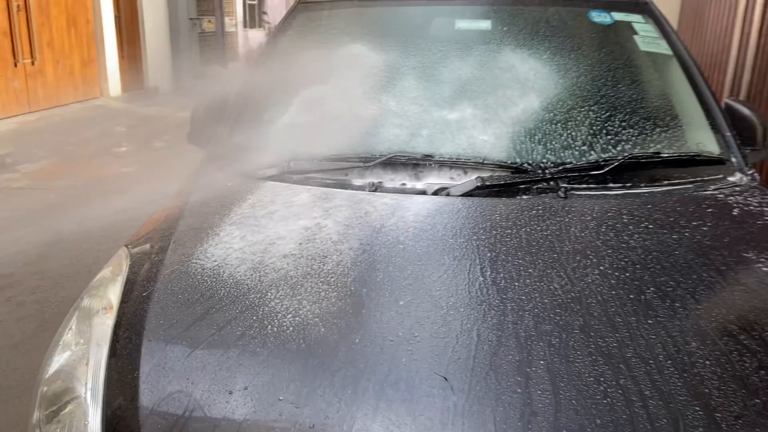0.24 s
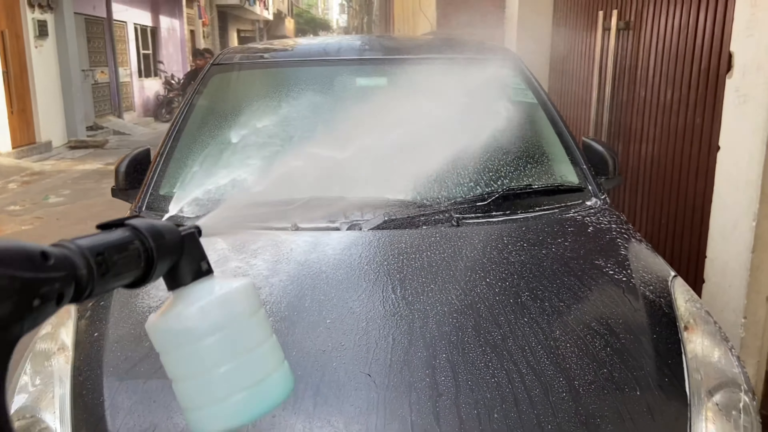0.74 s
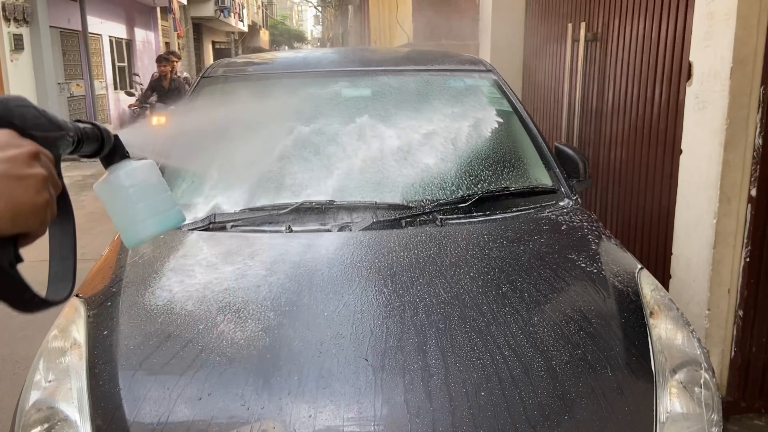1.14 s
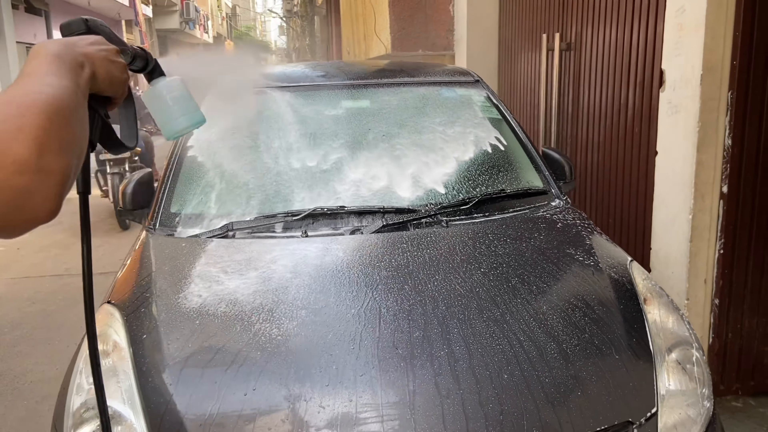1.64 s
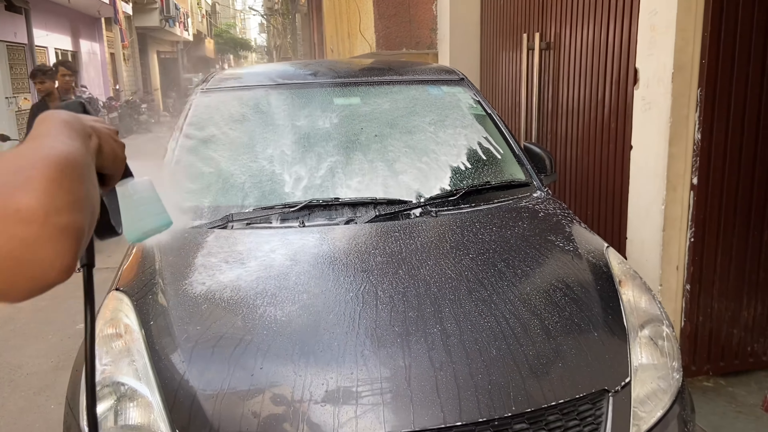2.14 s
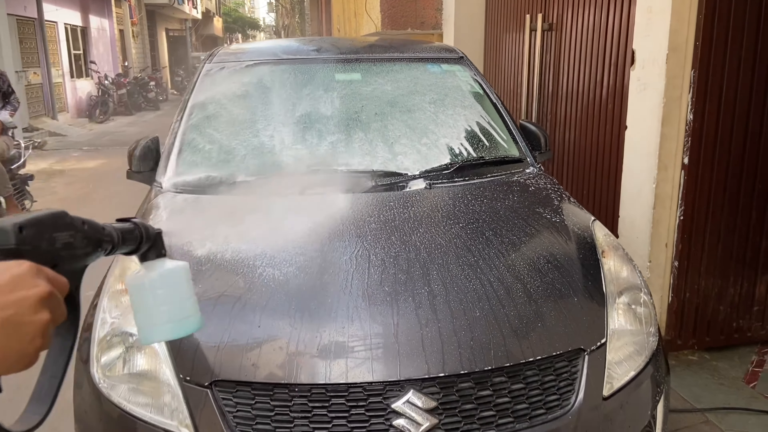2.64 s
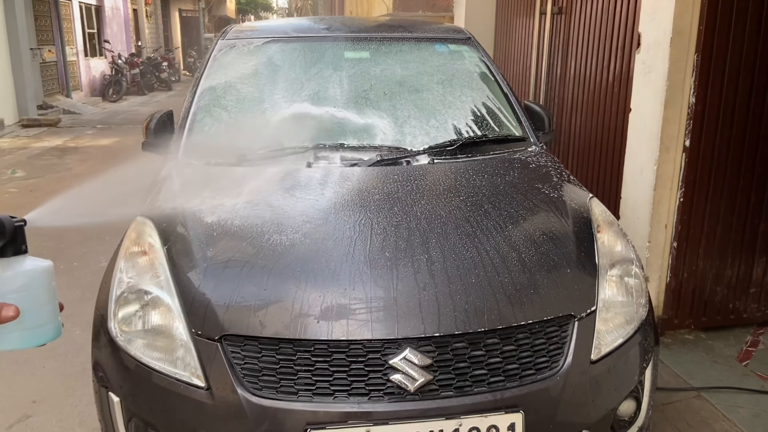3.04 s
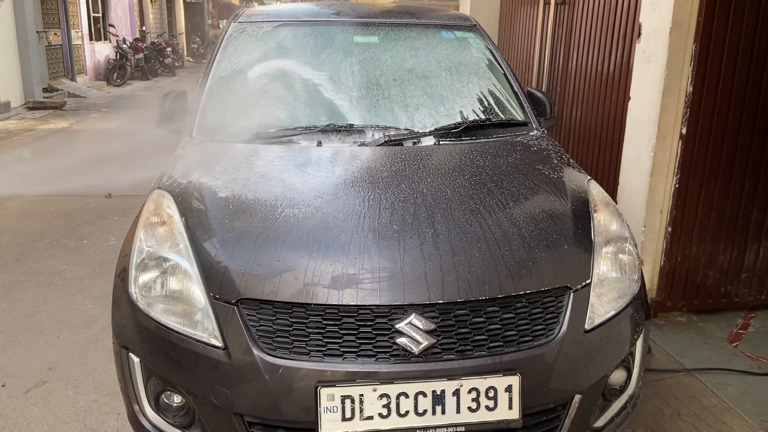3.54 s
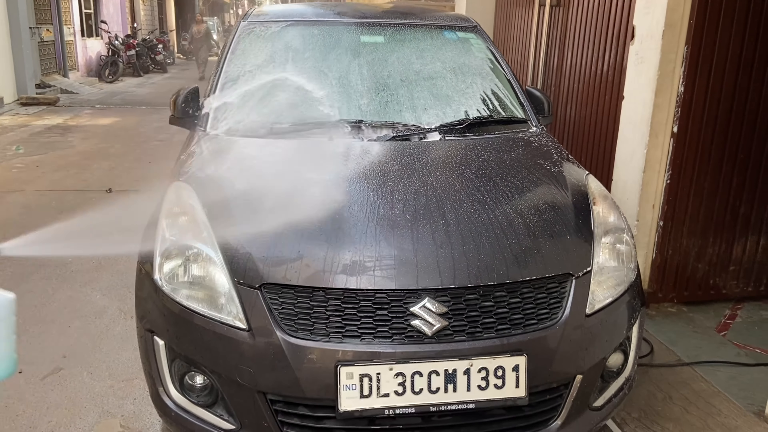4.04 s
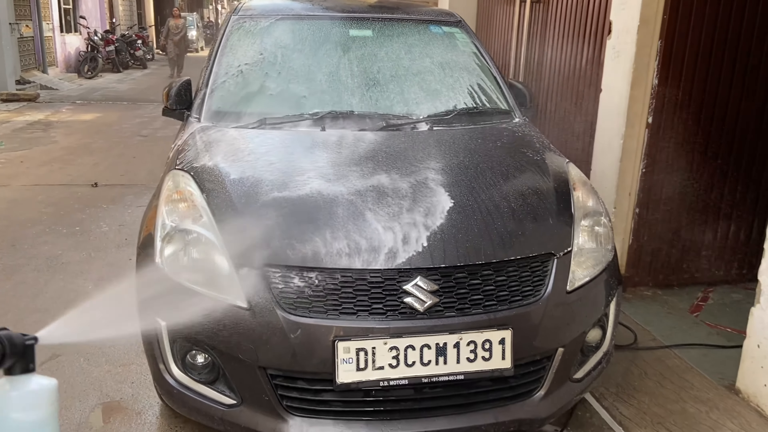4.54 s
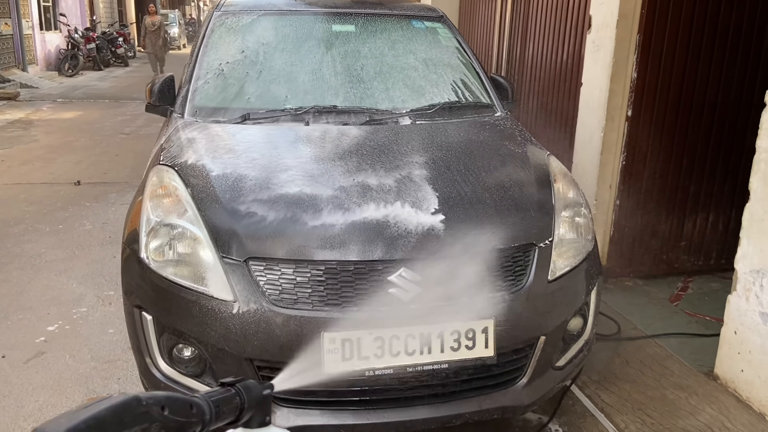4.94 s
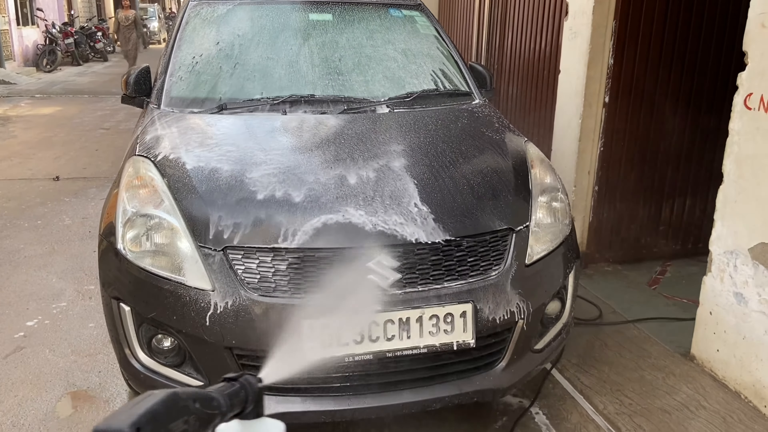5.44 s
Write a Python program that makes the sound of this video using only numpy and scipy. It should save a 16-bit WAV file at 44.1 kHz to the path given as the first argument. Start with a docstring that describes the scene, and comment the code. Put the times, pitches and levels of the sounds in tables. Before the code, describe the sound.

Forceful wet hiss and splash on glass and metal above an electric pump's drone, with a single-cylinder motorbike swelling by and fading.

```python
"""In a narrow lane an electric pressure washer sprays foam over a car while a single-cylinder motorbike passes behind.
Nozzle hiss and splash on glass and bonnet are banded noise; rough rings and a drifting whistle are narrow noise.
Motor and pump drone as noise and multiples of the shaft speed, with a shrill whine. The motorbike slows, picks up
and thumps past: a sum of firing orders, with rough gear whine while it is close.
Two microphone ports hear it all; the whole sound fades out and in once, briefly."""
import sys
import numpy as np
from scipy import signal
from scipy.fft import rfft, irfft
from scipy.io import wavfile

SR = 44100
rng = np.random.default_rng(int(sys.argv[2]) if len(sys.argv) > 2 else 0)


def wrap_up_sound(samples):
    """Save the sound to the file named by the first command line argument, as 16-bit audio."""
    columns = np.atleast_2d(samples).T
    # keep every value between -1 and 1, then stretch to whole-number steps
    tamed = np.clip(columns, -1, 1)
    steps = np.round(tamed * 32767).astype(np.int16)
    wavfile.write(sys.argv[1], SR, steps)


N = 250884
TIME = np.arange(N) / SR
SPLIT = np.array([[.5], [-.5]])   # shares a left-right difference in dB between the ports

# Coherence of noise at the two ports: (frequency [Hz], likeness [0-1])
LIKENESS = [(40, .97), (150, .85), (350, .6), (1000, .2), (2400, .6), (3400, .3), (4200, .7), (5500, .25),
            (6600, .86), (15000, .86)]
# Balance of noise: (frequency [Hz], left-right difference [dB])
TILT = [(40, 2.2), (300, 4.4), (1000, 3), (2800, 0.18), (5300, 3.5), (6300, .1), (15000, .1)]
# Phase of noise: (frequency [Hz], lead of the right port [turns])
PORT_TURNS = [(0, 0), (500, 0), (1100, .25), (2000, .14), (3100, -.19), (3700, .06), (4500, -.02),
              (6200, -1), (6900, -1), (15400, 1), (22050, 1)]

# The lance: (time [s], nozzle hiss level [dB], splash level [dB])
LANCE_DB = [(0, -28, -28), (.15, -26, -29), (.35, -22.5, -25.5), (.47, -23, -27.5), (.56, -23.5, -26.5),
            (.68, -26, -28), (.8, -28, -29.5), (1.2, -32, -34), (1.6, -34, -33.5), (2.2, -33, -33.5),
            (2.5, -31.5, -31), (3.0, -30.5, -30), (3.4, -30.5, -31.5), (3.7, -30, -29.5), (4, -29.5, -30.5),
            (4.3, -30, -30), (4.7, -29.5, -31), (5.15, -28.5, -31.5), (5.69, -30, -31)]
# Relative spectrum of the nozzle hiss: (frequency [Hz], density [dB per Hz])
HISS = [(1500, -22), (3000, -24), (5000, -36), (6500, 1.5), (8000, 2), (10000, 2.5), (12000, 4),
        (14000, 1.5), (15500, 2), (18000, -17)]
# Relative spectrum of the splash: (frequency [Hz], density [dB per Hz])
SPLASH = [(1200, -14), (1900, -1), (2250, 0), (2550, 3), (2900, 1), (3300, -0.5), (3800, -0.5),
          (4400, -3.5), (5300, -0.5), (6500, -8)]
# Balance of splash, landing foam and rings: (time [s], left-right difference [dB])
SPLASH_PAN = [(0, -5), (.35, 1), (.8, 1.5), (2.2, -0.5), (3.2, 1.5), (3.85, -1.5), (4.5, 1), (5.69, 0.5)]
# Splash heard straight from where the foam lands: (time [s], level [dB])
LANDING_DB = [(0, -29), (.06, -27), (.15, -25), (.25, -27.5), (.4, -28), (.55, -40), (.75, -37), (1.2, -49),
              (4.4, -50), (4.7, -38), (4.95, -36), (5.15, -33), (5.35, -38.5), (5.69, -38)]
# Its relative spectrum: (frequency [Hz], density [dB per Hz])
LANDING = [(1800, -1), (2100, -2), (2700, 0), (3300, 1), (3900, -3), (4400, 1.5), (4900, -2.5), (5600, -1)]
# Its coherence: (frequency [Hz], likeness [0-1])
LANDING_LIKENESS = [(1800, .9), (5600, .9)]
# Its phase: (frequency [Hz], lead of the right port [turns])
LANDING_TURNS = [(0, .14), (2000, .14), (2300, 0), (2700, -.17), (3350, -.5), (4000, -1), (4500, -1),
                 (5000, -1.17), (5500, -1.5), (22050, -2)]
# The spray crosses a hollow panel: (start [s], end [s], edge slope [dB/s], lower ring [Hz],
# lower ring level [dB], upper ring level [dB])
SWEEPS = [(0.04, 0.1, 32, 2500, -47, -34), (0.179, 0.389, 60, 2450, -35, -34.5),
          (0.503, 0.55, 150, 2380, -40, -60), (0.63, 0.68, 98, 2430, -39, -60),
          (2.59, 2.616, 120, 2600, -36, -54), (2.76, 2.86, 80, 2500, -36.5, -54),
          (2.96, 3.019, 100, 2516, -43, -54), (3.08, 3.13, 122, 2430, -43, -59),
          (3.27, 3.519, 60, 2463, -39, -59), (3.66, 3.78, 90, 2683, -36.5, -60),
          (4.13, 4.3, 60, 2495, -39, -61.5), (4.65, 4.76, 70, 2480, -40, -43),
          (4.869, 4.98, 70, 2540, -42, -42), (5.04, 5.259, 90, 2540, -39, -41),
          (5.44, 5.6, 60, 2680, -43, -38.5)]
# Noise bandwidths of the rings: (lower ring [Hz], upper ring [Hz])
RING_WIDTHS = (117, 1200)
UPPER_RING_HZ = 4415

# Relative spectrum of motor fan and lane rumble: (frequency [Hz], density [dB per Hz])
DRONE = [(30, -16), (50, 1), (110, 8), (170, 11), (250, 1), (400, -2.5), (470, 1.5), (535, -4), (620, 1),
         (800, -1.5), (1000, -4), (1250, 1), (1650, -5.5), (1900, -3), (2600, -19.5), (5500, -22)]
# Its level: (time [s], level [dB])
DRONE_DB = [(0, -28), (1, -29.5), (2, -29), (3, -26.5), (4, -28.5), (5, -30), (5.69, -29.5)]
# Thin tone between the pump's multiples: (time [s], level [dB])
MOTOR_TONE = [(0, -40), (.7, -48), (2.3, -49), (3.4, -53), (4.3, -58), (5.69, -60)]
MOTOR_TONE_HZ, SHAFT_HZ = 586.3, 46.52
# Orders of the pump tones: multiples of the shaft speed [-]
PUMP_MULTIPLES = [9, 10, 11, 12, 13, 14, 15, 25, 26, 28, 29, 31, 33, 37]
# Each pump tone shifts once as the listener moves about: (level before [dB], level after [dB],
# time of shift [s], left-right difference [dB], phase lead of the left port [rad])
PUMP = [(-52.5, -40, 3.96, 5.5, -1), (-39.5, -57, 4, 4, -0.5), (-51.5, -46, 2.8, 7, 1.26),
        (-41, -54, 4.1, 2.5, 1.6), (-41.5, -40, 2.8, 1.5, -0.2), (-45, -62, 1.6, 1, 4),
        (-47.5, -44, 1.7, 1.5, -1.25), (-39, -46.5, 2.44, -0.5, -1.43), (-47, -66, 4.3, 5.5, -0.5),
        (-65, -49, 4.7, 13, -4), (-47.5, -58, 3.3, -4, -2), (-41, -45, 4, -0.5, -2.5),
        (-45.5, -72, 3.7, -4, -1.5), (-81, -48.5, 2.7, -6, -4)]
SHIFT_SPAN_S = 0.24
# Single pump tones swell, sink or change side for a moment: (centre [s], half span [s],
# shaft multiple [-], level change [dB], left-right change [dB])
PUMP_SWELLS = [(0.26, 0.18, 10, -2.5, 0), (.1, 0.25, 12, -1, 7), (0.32, 0.13, 13, -8, 0),
               (0.88, 0.13, 13, -4, -3), (3.63, 0.19, 13, 3.5, -2), (0.092, 0.26, 15, 8.5, 0),
               (1.95, 0.35, 15, 3, 0), (1.8, .3, 11, -16, 0), (0.93, 0.43, 11, 9, 3),
               (0.38, 0.35, 25, -4.5, 1), (1.15, 0.43, 12, 3.5, -10), (2.1, 0.29, 12, 1, 4.5),
               (0.79, 0.42, 9, 4, 0), (5, 0.34, 12, -5, 4), (1.8, .3, 13, 2, -2), (2.4, .4, 13, -1, 4)]
# The motor's shrill slot whine: (time [s], level [dB])
WHINE = [(0.0, -56), (0.2, -43), (0.84, -49), (0.89, -39), (1.08, -49.5), (1.63, -40), (1.74, -54),
         (1.79, -39), (1.98, -50), (2.04, -40), (2.17, -47), (2.25, -38.5), (2.87, -39), (3.12, -45),
         (3.17, -38), (3.23, -45), (3.31, -42), (3.39, -49), (3.44, -34.5), (3.62, -43), (3.76, -36.5),
         (3.83, -46), (3.92, -41), (4.25, -43), (4.33, -46), (4.45, -37), (4.55, -49), (4.64, -40),
         (4.86, -36), (4.96, -46), (5.07, -41.5), (5.3, -39), (5.355, -50), (5.395, -34), (5.6, -36.5),
         (5.69, -43)]
WHINE_FLICKER_DB = 1.9

# Motorbike speed: (time [s], firing rate [1/s])
FIRING = [(0, 21.7), (.19, 22.2), (.38, 21.89), (.57, 20.85), (.95, 20.14), (1.14, 19.17), (1.33, 16.61),
          (1.52, 15.75), (2.28, 19.47), (2.66, 21.03), (3.42, 25.08), (3.61, 25.84), (3.8, 25.4),
          (3.99, 26.11), (4.18, 26.16), (4.75, 24.45), (4.94, 22.79), (5.32, 21.3), (5.69, 22.4)]
# The motorbike comes near and leaves: (time [s], exhaust level [dB])
BIKE = [(0.0, -34.5), (0.52, -33.5), (1.03, -34), (1.55, -32.5), (2.07, -26.5), (2.59, -25.5), (3.1, -19.5),
        (3.62, -19), (4.14, -20), (4.66, -24.5), (5.17, -35), (5.69, -40.5)]
# The two lowest orders, 2 and 3: (time [s], level of order 2 [dB])
THUD = [(0, -45), (.6, -54), (1.2, -45), (1.7, -57), (2.1, -52), (2.7, -44), (3.1, -49), (3.7, -39),
        (4.2, -45), (4.7, -43.5), (5.3, -39.5), (5.69, -44)]
# Colour of orders 4-10: (frequency [Hz], level against the exhaust [dB])
BOOM = [(60.0, -52), (90.0, -13), (120.0, -11.5), (150.0, -6.5), (175.0, -4.5), (200.0, -16.5),
        (240.0, -18.5), (290.0, -34)]
# Colour of the orders above 10, the rasp: (frequency [Hz], level before RASP_DB is added [dB])
EXHAUST = [(170, -5.5), (250, -8), (285, -5), (330, -8.5), (400, -17), (460, -12.5), (600, -25), (800, -8)]
RASP_DB = -15.5   # against the exhaust level
# Single orders swell or sink as the bike moves between the walls:
# (centre [s], half span [s], order [-], level change [dB])
ORDER_SWELLS = [(0.33, 0.19, 5, 2), (.38, 0.086, 6, 11.5), (0.57, 0.67, 8, 6.5), (1.19, 0.31, 9, 7.5),
                (1.47, 0.17, 10, 9), (1.77, 0.13, 9, 10), (1.28, .12, 8, 6), (1.25, .25, 4, 10),
                (.9, .45, 15, 7.5), (1.65, 0.55, 18, 6.5), (5.25, .45, 14, -9), (.15, .25, 11, -7),
                (4.7, .15, 5, 6), (2.0, .12, 8, 4.5), (2.0, .4, 4, -10), (5.23, 0.34, 4, 6),
                (5.11, 0.42, 3, 5), (1.5, .5, 11, -7), (1.4, .5, 12, -8), (5.25, .12, 6, 9),
                (2.04, 0.15, 6, -8), (2.18, 0.11, 5, 13.5), (2.55, 0.19, 7, 6), (2.75, 0.15, 14, 10.5),
                (2.9, 0.041, 7, -3), (2.63, 0.3, 22, 10), (2.9, .25, 21, 2), (3.18, 0.2, 20, 7.5),
                (3.34, 0.19, 19, 8), (3.65, 0.1, 19, 13.5), (3.37, 0.062, 7, -3), (3.68, 0.04, 7, 2.5),
                (3.87, 0.12, 8, -7.5), (3.08, .07, 6, -6), (3.39, 0.087, 5, -7), (3.34, .15, 9, 1),
                (4.5, 0.077, 6, 4), (3.18, 0.15, 14, 10.5), (3.25, 0.17, 13, 1), (3.35, 0.085, 8, -9),
                (3.62, 0.087, 13, 6.5), (3.75, 0.12, 14, 9), (3.7, 0.083, 8, 6), (3.9, 0.084, 7, -5),
                (4.2, 0.036, 6, 6), (4.33, 0.093, 7, -14), (4.6, 0.13, 8, -14), (4.55, 0.11, 7, 2),
                (4.9, .1, 7, -1), (6.5, 0.093, 5, 8), (4.4, 0.056, 6, 2), (3.7, 0.34, 18, 3),
                (4.3, 0.96, 11, -13), (3.1, 0.36, 4, -29), (3.14, 0.38, 5, 5.5), (3.16, 0.1, 7, 6.5),
                (3.66, 0.41, 5, 6), (4.0, 0.21, 8, 14), (4.07, 0.18, 5, -12), (4.37, 0.39, 13, 10),
                (4.26, 0.77, 7, -3.5), (4.4, 0.76, 4, 3.5), (4.9, 0.15, 8, 10.5), (4.95, 0.1, 6, -12),
                (5.41, 0.19, 8, 10.5)]
# Colour of the part unlike at the ports: (frequency [Hz], level before SIDE_DB is added [dB])
SIDEWAYS = [(40, -30), (90, -44), (150, -1), (200, -6), (240, -13), (300, -15.5), (450, -23), (800, -22)]
# Level of the unlike part against the exhaust, and its rise while the bike is abreast
SIDE_DB, ABREAST_S, ABREAST_SPAN_S, ABREAST_DB = -18, 4.05, 0.98, 9.5
FIRST_FIRING_TURNS = .42   # how far into its cycle the engine starts
SMEAR_RAD = 1.6   # phase scatter of the orders outside the blur; small enough that each firing throbs
DRAW_OUT_RAD = .16   # phase curvature: low orders lead the high ones
# For a while the echoes blur the throb: extra scatter as a multiple of SMEAR_RAD
BLURRED_S, BLURRED_SPAN_S, BLURRED_TIMES = 4.25, .5, 2.5
# Gear contacts: (time [s], tooth rate [Hz])
TOOTH_RATE = [(3.0, 865), (3.4, 905), (3.7, 916), (4.12, 943), (4.4, 921), (4.8, 894)]
# Gear whine: (multiple of the tooth rate [-], noise width [Hz], time of the bend [s], level there [dB],
# rise before it [dB/s], fall after it [dB/s]; a negative fall goes on rising)
CLATTER = [(1, 43, 4, -35, 3.5, -1), (2, 84, 3.65, -39.5, 9, 2), (4, 113, 4.3, -41.5, 22, 6)]
# Gears are heard only while the bike is close; how fast they come and go
CLOSE_START_S, CLOSE_END_S, COME_DB_PER_S, GO_DB_PER_S = 3, 4.72, 36, 120

# A rough whistle drifts through the spray: (time [s], centre frequency [Hz], level [dB])
WHISTLE = [(3.1, 2600, -57), (3.4, 2700, -41), (3.58, 2850, -34), (3.72, 2830, -29.5), (3.87, 2780, -33),
           (4.0, 2830, -35.5), (4.2, 2790, -39), (4.4, 2760, -37), (4.58, 2760, -43), (4.75, 2700, -55)]

FADE_S, FADE_OUT_S, FADE_IN_S, FADE_DB = 5.0055, .028, .027, -28
CUTOFF_HZ = 15950


def amp(db):
    """Decibel law: amplitude gain of a level in dB."""
    return 10 ** (np.asarray(db) / 20)


def rms_one(x):
    """Power normalisation: scale to rms 1."""
    return x / np.sqrt(np.mean(x ** 2) + 1e-20)


def in_time(rows):
    """Linear interpolation: the columns of a time table at every sample."""
    s, *columns = np.transpose(rows)
    return [np.interp(TIME, s, column) for column in columns]


def at_hz(points, hz):
    """Logarithmic frequency scale: read a spectrum between its points."""
    table_hz, values = np.transpose(points)
    return np.interp(np.log(hz), np.log(table_hz), values)


def bell(centre_s, span_s):
    """Gaussian envelope: 1 at its centre, 1/e one span away."""
    return np.exp(-((TIME - centre_s) / span_s) ** 2)


def swell(start_s, end_s, rise_db_per_s, fall_db_per_s):
    """Exponential growth and decay: 0 dB between two times, straight slopes in dB outside."""
    before = np.maximum(start_s - TIME, 0)
    after = np.maximum(TIME - end_s, 0)
    return -rise_db_per_s * before - fall_db_per_s * after


def drift(rate):
    """Low-pass random process: rms 1, changing about rate times a second."""
    step = 40   # samples per drawn value
    pole = np.exp(-2 * np.pi * rate * step / SR)
    draws = rng.standard_normal(N // step + 2002)
    slow = signal.lfilter([1], [1, -2 * pole, pole * pole], draws)[2000:]   # drop the settling
    return np.interp(np.arange(N) / step, np.arange(len(slow)), rms_one(slow))


def port_noise(spectrum, surge_db, patchy_db, likeness=LIKENESS, turns=PORT_TURNS):
    """Partial coherence: third-octave noise at two ports, surging together, flickering by band; rms 1."""
    hz = np.fft.rfftfreq(N, 1 / SR) + 1
    lowest_hz, highest_hz = spectrum[0][0], spectrum[-1][0]
    shared, own = rfft(rng.standard_normal((2, N)))
    alike = at_hz(likeness, hz)
    lead = np.exp(2j * np.pi * np.interp(hz, *np.transpose(turns)))
    right = lead * (alike * shared + np.sqrt(1 - alike ** 2) * own)
    ports = np.array([shared, right])
    ports *= amp(at_hz(spectrum, hz) + at_hz(TILT, hz) * SPLIT)
    ports *= (hz > lowest_hz) & (hz < highest_hz * 1.1)
    place = 3 * np.log2(hz)   # in third octaves
    out = 0
    for k in range(int(3 * np.log2(lowest_hz)), int(3 * np.log2(highest_hz)) + 2):
        crossfade = np.clip(1 - abs(place - k), 0, 1)
        band = irfft(ports * crossfade, N)
        out = out + band * amp(surge_db + patchy_db * drift(18.2))
    return rms_one(out)


def rough_tone(turn, width_hz, alike):
    """Random modulation: a carrier smeared into a narrow noise band, partly alike at the two ports."""
    left, own = (drift(width_hz) + 1j * drift(width_hz) for port in range(2))
    right = alike * left + np.sqrt(1 - alike ** 2) * own
    return np.real(np.exp(1j * turn) * [left, right])


def panel_rings():
    """Resonance of a hollow panel: two narrow noise bands; the lower glides between the sweeps' pitches."""
    centres_s = [(start + end) / 2 for start, end, *rest in SWEEPS]
    lower_hz = np.interp(TIME, centres_s, [row[3] for row in SWEEPS])
    turns = 2 * np.pi * np.cumsum(lower_hz) / SR, 2 * np.pi * UPPER_RING_HZ * TIME
    out = 0
    for k, width_hz in enumerate(RING_WIDTHS):
        gain = 0
        for start, end, edge, lower, *rings_db in SWEEPS:
            gain = gain + amp(rings_db[k] + swell(start, end, edge, edge))
        out = out + gain * amp(1.5 * drift(7.2)) * rough_tone(turns[k], width_hz, alike=0.32)
    return out


def lance():
    """Flow noise: nozzle hiss, splash and landing foam share the surges of the foaming flow."""
    hiss_db, splash_db = in_time(LANCE_DB)
    landing_db, = in_time(LANDING_DB)
    pan_db, = in_time(SPLASH_PAN)
    surge_db = .22 * drift(4) + .5 * drift(13)
    hiss = amp(hiss_db) * port_noise(HISS, surge_db / 2, patchy_db=1.3)
    splash = amp(splash_db) * port_noise(SPLASH, surge_db, patchy_db=1.5)
    landing = amp(landing_db) * port_noise(LANDING, 1.5 * surge_db, patchy_db=1.5,
                                           likeness=LANDING_LIKENESS, turns=LANDING_TURNS)
    return hiss + (splash + landing + panel_rings()) * amp(pan_db * SPLIT)


def motor_drone():
    """Broadband and tonal radiation: fan and lane rumble as noise, with one thin motor tone."""
    rumble = amp(in_time(DRONE_DB)[0]) * port_noise(DRONE, 0, patchy_db=1.5)
    tone_db = in_time(MOTOR_TONE)[0] + 1.2 * drift(5.2)
    return rumble + np.sqrt(2) * amp(tone_db) * np.sin(2 * np.pi * MOTOR_TONE_HZ * TIME)


def pump():
    """Harmonics of rotation: wavering tones of fixed pitch at multiples of the shaft speed."""
    out = 0
    for multiple, (first_db, second_db, shift_s, pan_db, lead) in zip(PUMP_MULTIPLES, PUMP):
        moved = .5 + .5 * np.tanh((TIME - shift_s) / SHIFT_SPAN_S)
        waver_db = 0.069 * multiple * drift(4.1) + 0.4 * drift(0.78)   # high tones waver most
        level_db = first_db + moved * (second_db - first_db) + waver_db
        for s, span, swelling, db, sideways_db in PUMP_SWELLS:
            if swelling == multiple:
                level_db = level_db + db * bell(s, span)
                pan_db = pan_db + sideways_db * bell(s, span)
        turn = 2 * np.pi * (multiple * SHAFT_HZ * TIME + rng.random()) + .1 * drift(4)
        out = out + np.sqrt(2) * amp(level_db + pan_db * SPLIT) * np.sin(turn + [[lead], [0]])
    return out


def whine():
    """Slot harmonic: a thin tone at forty times the shaft speed, a little ahead at the right port."""
    level_db = in_time(WHINE)[0] + WHINE_FLICKER_DB * drift(7.6)
    turn = 2 * np.pi * 40 * SHAFT_HZ * TIME + 0.077 * drift(4.3)
    return np.sqrt(2) * amp(level_db + np.array([[1.5], [-1.1]])) * np.sin(turn + [[-.6], [0]])


def motorbike():
    """Fourier series of the firings: orders smeared in phase by the lane's echoes draw out each thump."""
    per_s, = in_time(FIRING)
    exhaust_db, = in_time(BIKE)
    thud_db, = in_time(THUD)
    side_db = exhaust_db + SIDE_DB + ABREAST_DB * bell(ABREAST_S, ABREAST_SPAN_S)
    uneven_per_s = per_s * (1 + 0.0034 * drift(11.6))
    turn = 2 * np.pi * (FIRST_FIRING_TURNS + np.cumsum(uneven_per_s) / SR)
    smear = SMEAR_RAD * (1 + BLURRED_TIMES * bell(BLURRED_S, BLURRED_SPAN_S))
    alike, unlike = 0, 0
    for order in range(2, 30):
        hz = order * per_s
        if order < 4:
            level_db = thud_db - 3 * (order - 2) + 2.0 * drift(4.6)
        elif order <= 10:
            level_db = exhaust_db + at_hz(BOOM, hz) + 1.46 * drift(8.6)
        else:
            level_db = exhaust_db + RASP_DB + at_hz(EXHAUST, hz) + 2.8 * drift(2.35)
        for s, span, swelling, db in ORDER_SWELLS:
            if swelling == order:
                level_db = level_db + db * bell(s, span)
        draw_out = DRAW_OUT_RAD * order * (order - 13)
        phase = order * turn - draw_out + smear * rng.random() + 0.081 * order * drift(1.11)
        alike = alike + amp(level_db) * np.cos(phase)
        sideways_db = side_db + at_hz(SIDEWAYS, hz) + 0.4 * min(order, 12) * drift(2.0)
        unlike = unlike + amp(sideways_db) * np.sin(phase + 1.64 * drift(0.19))
    # the unlike part has opposite signs at the two ports
    return np.sqrt(2) * (alike * amp([[1.2], [-1.2]]) + unlike * [[1], [-1]])


def clatter():
    """Gear meshing: loose teeth give rough multiples of the tooth rate, flickering unevenly in level."""
    near = amp(swell(CLOSE_START_S, CLOSE_END_S, COME_DB_PER_S, GO_DB_PER_S))
    teeth = 2 * np.pi * np.cumsum(in_time(TOOTH_RATE)[0]) / SR
    out = 0
    for multiple, width_hz, s, bend_db, rise, fall in CLATTER:
        level_db = bend_db + swell(s, s, rise, fall) + 2.0 * drift(9.5)
        out = out + amp(level_db) * rough_tone(multiple * teeth, width_hz, alike=0.075)
    return near * out


def whistle():
    """Narrow-band noise: a rough, bursting band of the spray whose centre frequency wanders."""
    hz, level_db = in_time(WHISTLE)
    turn = 2 * np.pi * np.cumsum(hz) / SR
    return amp(level_db + 1.4 * drift(16.0)) * rough_tone(turn, width_hz=99, alike=0.26)


def scene():
    """Superposition: the pressures of all sources add at the two ports."""
    washer = lance() + motor_drone() + pump() + whine()
    return washer + motorbike() + clatter() + whistle()


def record(dry):
    """Gain and low-pass filtering: one brief fade out and in, then the top is cut."""
    fade = np.interp(TIME, [FADE_S - FADE_OUT_S, FADE_S, FADE_S + FADE_IN_S], [1, amp(FADE_DB), 1])
    top_cut = signal.ellip(14, .3, 80, CUTOFF_HZ - 200, fs=SR, output="sos")
    return signal.sosfilt(top_cut, dry * fade)


dry = scene()
out = record(dry)
wrap_up_sound(out)
```